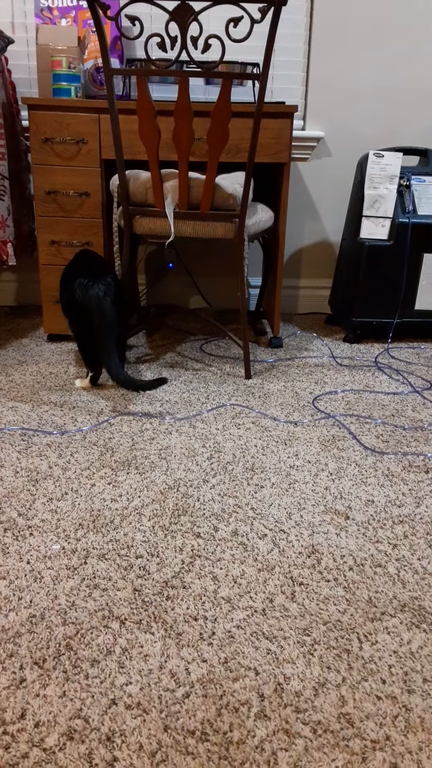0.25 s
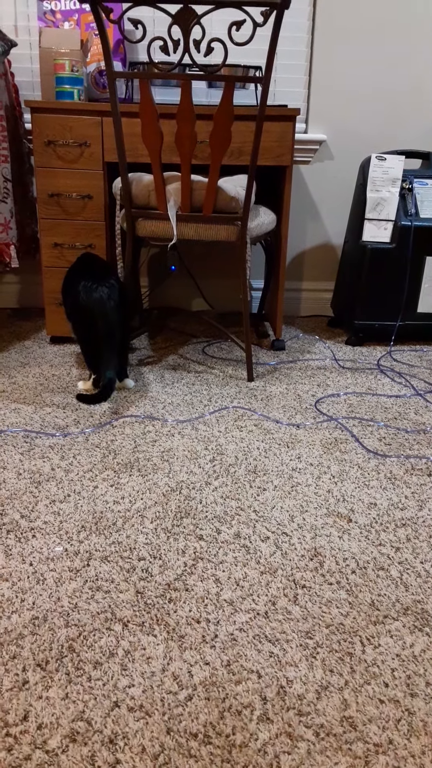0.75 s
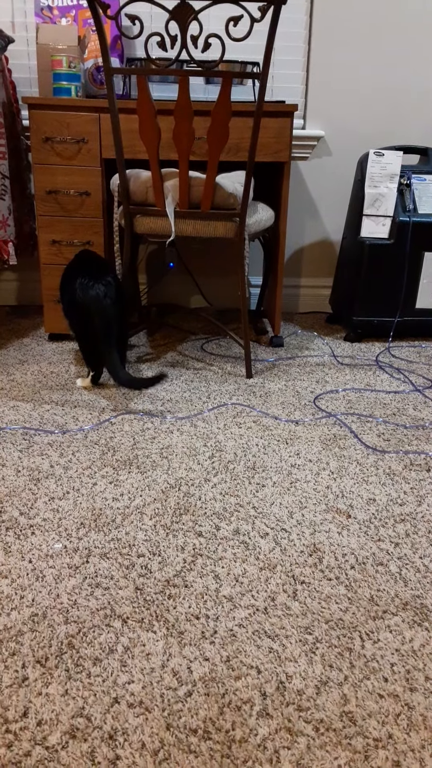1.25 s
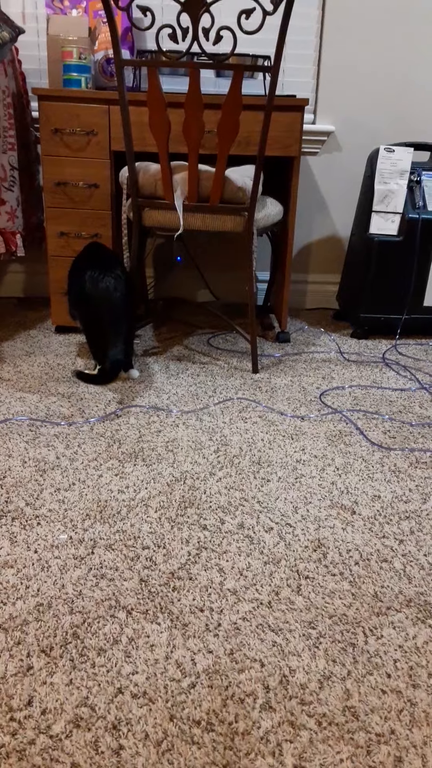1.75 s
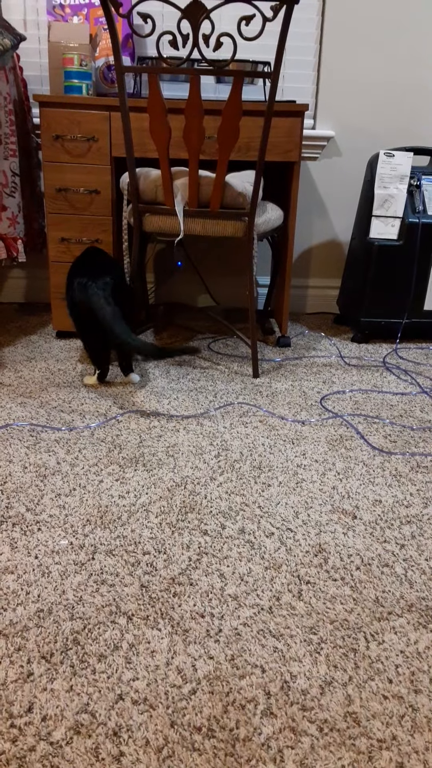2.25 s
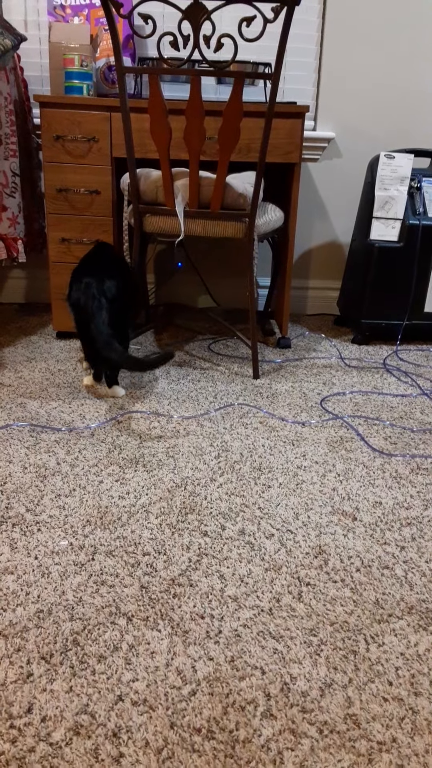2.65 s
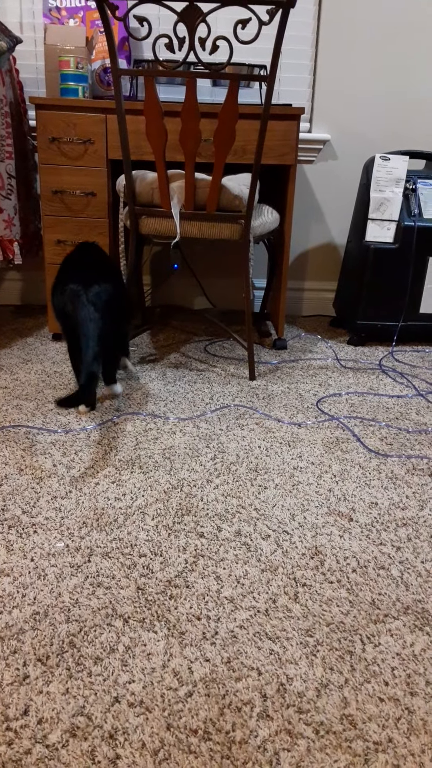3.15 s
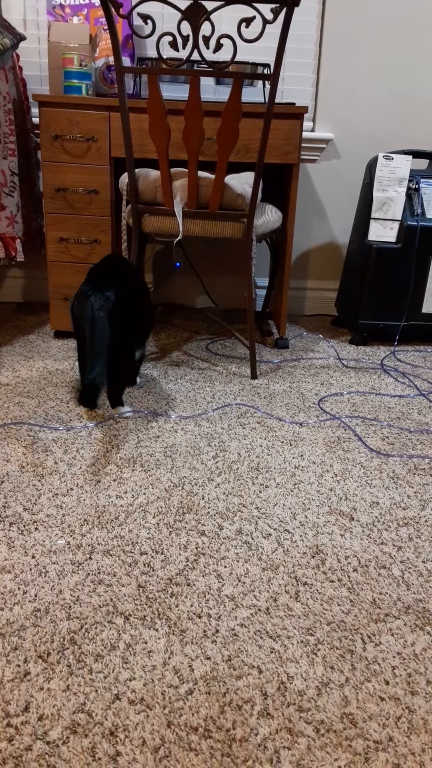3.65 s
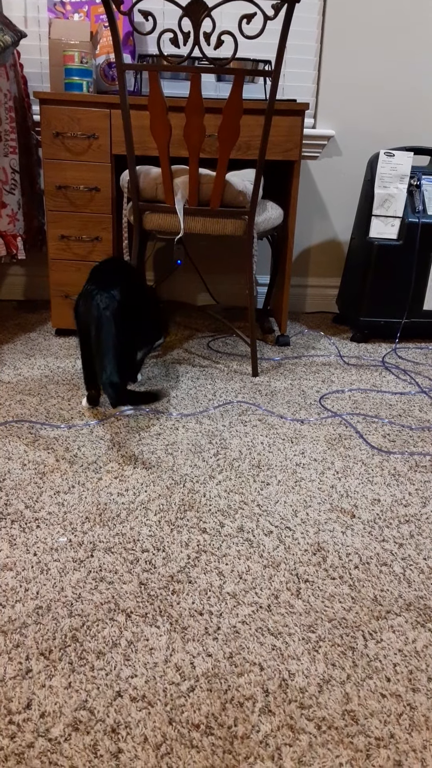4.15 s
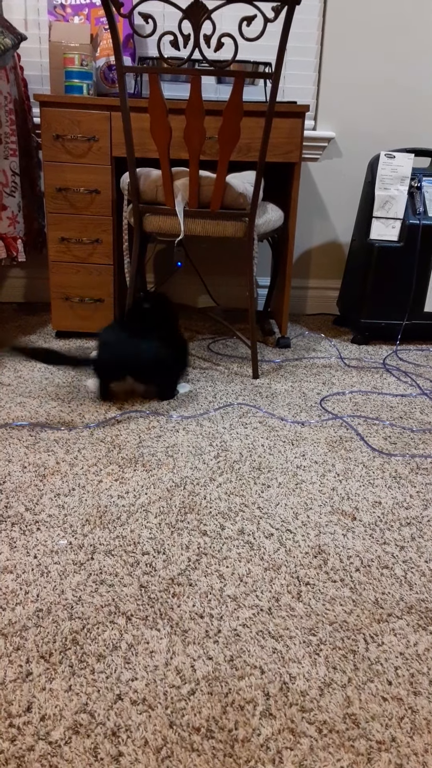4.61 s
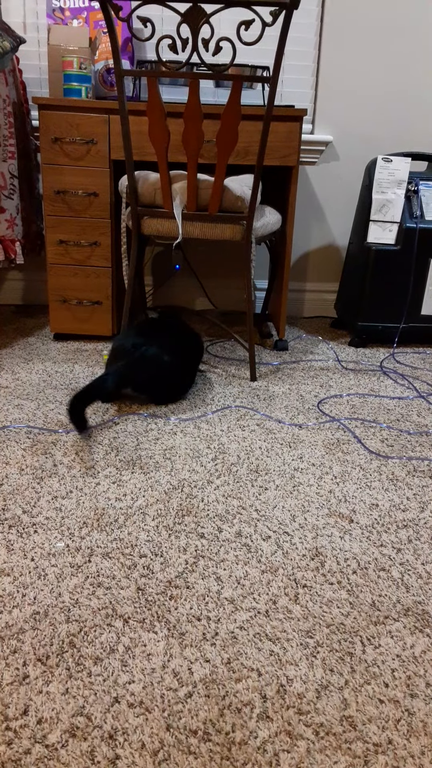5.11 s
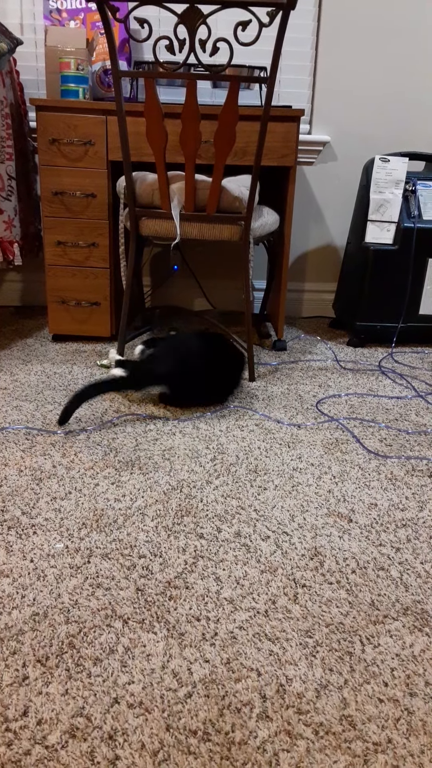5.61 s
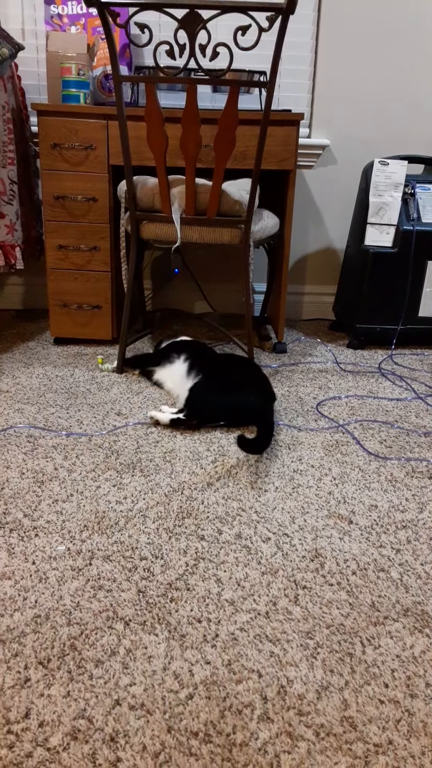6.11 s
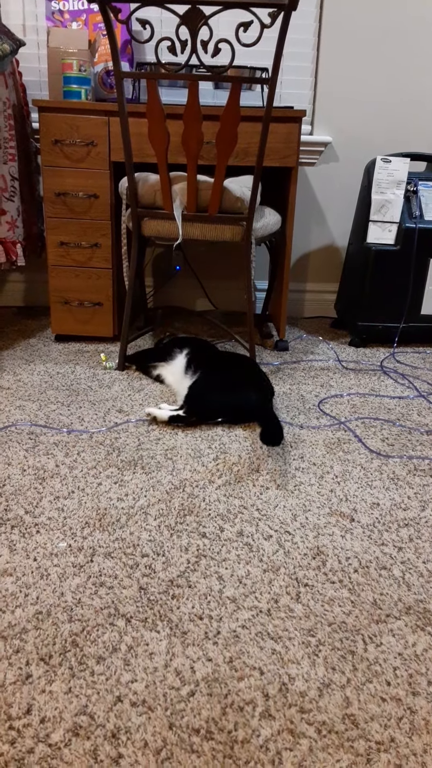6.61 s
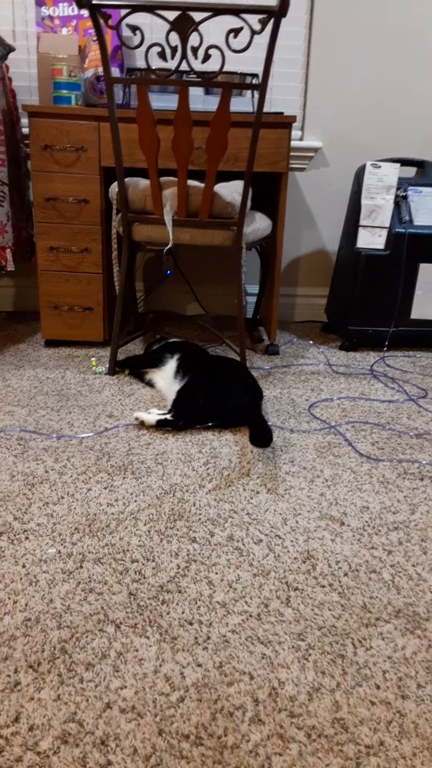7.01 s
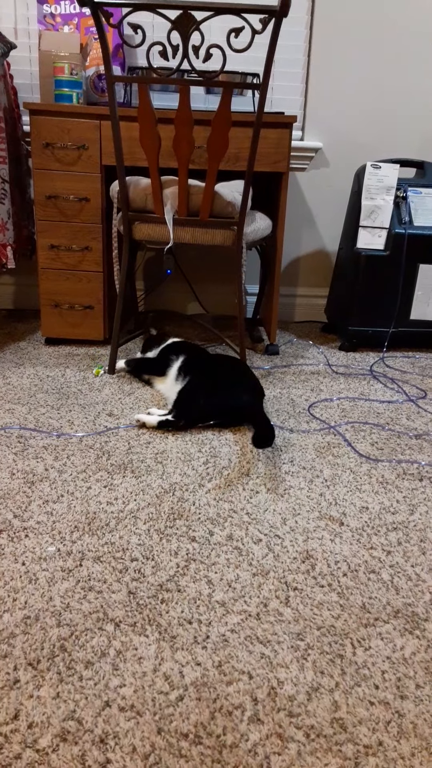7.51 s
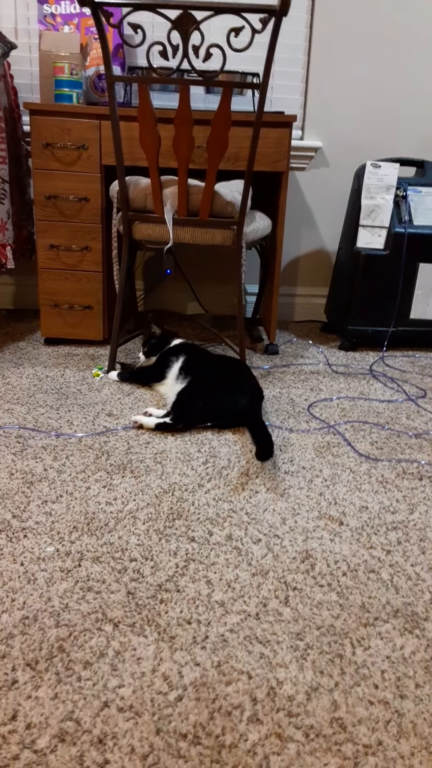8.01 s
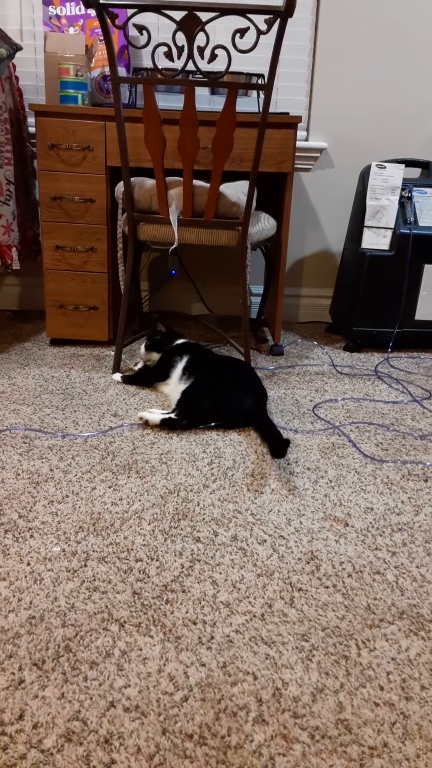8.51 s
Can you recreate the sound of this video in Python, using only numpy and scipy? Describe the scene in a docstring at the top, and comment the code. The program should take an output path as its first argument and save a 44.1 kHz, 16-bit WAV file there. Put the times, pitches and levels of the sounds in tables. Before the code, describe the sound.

Continuous compressor hum and airy fan noise fill a home room, heard in stereo from a few steps away with short reflections. Around two seconds a valve spits a bright hiss and muffled exhaust whoosh that fades away. Midway, claws rasp in carpet and a hard toy clacks against a rattling metal chair, with a tiny ping. After a calmer stretch, one more clear clack and several small clicks come near the end.

```python
"""Oxygen concentrator and playing cat

A compressor hums as shaft orders, with steady fan and mains tones, rumble and air as shaped noise.
Gas feeds with a hiss; at the vent a noise jet whistles, a low sine thumps and exhaust noise gushes.
Pressure falls, so the hum speeds up and softens; it slows and hardens as pressure builds again.
A cat rolls on carpet: filtered slip noise for fibres and claws, decaying modes for the toy's ping.
The toy knocks on a metal chair: contact noise, joint rattle and ringing modes, echoed by the room."""
import sys
import numpy as np
from scipy import signal
from scipy.fft import rfft, irfft
from scipy.io import wavfile

SR = 44100
rng = np.random.default_rng(int(sys.argv[2]) if len(sys.argv) > 2 else 0)


def generate_wav(sig):
    """Save sig (samples, or channels by samples) to the path in sys.argv[1] as 16-bit PCM at SR."""
    pcm = np.round(np.clip(np.atleast_2d(sig).T, -1, 1) * 32767).astype(np.int16)
    wavfile.write(sys.argv[1], SR, pcm)


N = 386316
TIME, BINS = np.arange(N) / SR, np.fft.rfftfreq(N, 1 / SR)


def amp(db):
    """Decibels to gain."""
    return 10 ** (np.asarray(db) / 20)


def at_hz(points, hz):
    """Interpolates a (f/Hz, value) table on a log-frequency axis."""
    f, value = np.transpose(points)
    return np.interp(np.log(hz + 1), np.log(f + 1), value)


def unit(x):
    """Scales to rms 1."""
    return x / np.sqrt(np.mean(x ** 2) + 1e-30)


def add(mix, s, sound):
    """Adds a sound into mix at s seconds, cut at the end."""
    part = mix[round(s * SR):][:len(sound)]
    part += sound[:len(part)]


def drift(rate_hz, size=8192):
    """Slow random modulation: low-passed noise of rms 1."""
    hz = np.fft.rfftfreq(size, N / SR / size)
    slow = irfft(rfft(rng.standard_normal(size)) / (1 + (hz / rate_hz) ** 4))
    return np.interp(TIME, np.linspace(0, N / SR, size), unit(slow))


# Left-right likeness of diffuse sound: (f/Hz, coherence)
COHERENCE = [(60, 0.99), (130, 1), (290, 0.96), (640, -0.21), (1410, -0.012), (3100, -0.15), (6820, -0.095),
             (15000, -0.26)]


def diffuse(gain):
    """Room-filling noise, gain per FFT bin: alike at both microphones only in the bass."""
    a, b = rfft(rng.standard_normal((2, N)))
    same = np.clip(at_hz(COHERENCE, BINS), -1, 1)
    right = same * a + np.sqrt(1 - same ** 2) * b
    return irfft(np.array([a, right]) * gain, N) * np.sqrt(SR / 2)


def hiss(spectrum):
    """Diffuse noise from a (f/Hz, level/(dB/Hz)) table."""
    return diffuse(amp(at_hz(spectrum, BINS)))


def colour(x, db):
    """Causal minimum-phase filter, dB per FFT bin of x."""
    log_gain = np.log(amp(np.concatenate([db, db[-2:0:-1]])))
    response = np.exp(np.conj(signal.hilbert(log_gain)))[:len(db)]
    return irfft(rfft(x) * response, len(x))


def contact(t, length_s, grain_db=0.91):
    """A decaying cluster of tiny slips, energy 1."""
    grain = amp(grain_db * np.minimum(rng.exponential(1, len(t)), 5))
    slips = rng.standard_normal(len(t)) * grain * np.exp(-t / length_s)
    return slips / np.linalg.norm(slips)


def flow(start_s, attack_s, hold_s, release_db_per_s):
    """Gain of a gas flow: opens linearly, holds, then dies away exponentially."""
    t = TIME - start_s
    return np.clip(t / attack_s, 0, 1) * amp(-release_db_per_s * np.maximum(t - hold_s, 0))


# First reflections from desk, walls and ceiling, before normalisation: (delay t/s, level/dB)
REFLECTIONS = [(.0012, -14), (.0023, -1), (.0047, -1.5), (.0069, 2.5), (.0105, -6.5), (.0155, -25),
               (.021, -2)]
# Reverberation time: (f/Hz, t60/s)
REVERB_T60 = [(600, 0.46), (1580, 0.32), (4180, 0.4), (11000, 0.25)]


def room(x, tail_db, direct_db=4, size=SR // 2, taps_per_s=4000):
    """Direct sound, early reflections, then sparse taps that decay by band; left response energy 1."""
    taps = rng.choice([-1., 1.], (2, size)) * (rng.random((2, size)) < taps_per_s / SR)
    hz, t, z = signal.stft(taps, SR, nperseg=256)
    decay = amp(-60 * t / at_hz(REVERB_T60, hz)[:, None])
    onset = np.clip(t / 0.0082, 0, 1)
    tail = signal.istft(z * decay * onset, SR)[1]
    response = amp(tail_db) * tail / np.linalg.norm(tail, axis=1, keepdims=True)
    response[:, 0] += amp(direct_db)
    for side in response:
        for delay_s, db in REFLECTIONS:
            jitter_s = rng.uniform(-.0003, .0003)  # separate per microphone
            add(side, abs(delay_s + jitter_s), amp([db]))
    return signal.fftconvolve(x[None], response / np.linalg.norm(response[0]), axes=1)[:, :N]


# Valve cycle: feed opens, full bed vents, feed shuts
FEED_S, VENT_S, SHUT_S = 0.844, 2.04, 5.7
BLEED_PER_S, EMPTY_S, FILL_S = .13, .2, 8.1


def pressure():
    """Bed pressure, 0 empty to 1 full: bleeds into the feed, drops at the vent, builds again."""
    before = 1 - BLEED_PER_S * np.maximum(TIME - FEED_S, 0)
    vented = np.clip((TIME - VENT_S) / EMPTY_S, 0, 1)
    return (1 - vented) * before + vented * (TIME - VENT_S) / FILL_S


# Shaft rate, full and empty
LOADED_HZ, EASED_HZ = 28.11, 28.88
ROLL_OFF_DB_PER_OCTAVE, SOFTEN_DB, SOFTEN_DB_PER_ORDER = 25, 1.5, 0.38
# Low shaft orders at full pressure, before panel lift: (multiple of shaft rate, level/dB)
SHAFT_ORDERS = [(2, -58), (3, -51.5), (4, -35.5), (5, -56), (6, -38), (7, -61.5), (8, -47.5), (9, -52),
                (10, -42), (11, -44), (12, -46), (13, -49), (15, -54)]
# Cabinet panel resonances: (f/Hz, width/Hz, lift/dB)
PANEL_MODES = [(507, 2.8, 8.5), (535, 12, 8.5), (675.4, 19, 16.5), (793, 18.6, 20.5), (817, 14.5, 15),
               (1043, 56, 25)]


def compressor(load, speed_hz, turns, flutter=0.034, flutter_hz=6, spread_hz=900, smear=0.15,
               sweep_turns=.012, count=38):
    """Shaft orders: pressure hardens the piston strokes, panels lift orders near resonance."""
    out = np.zeros((2, N))
    orders, levels = np.transpose(SHAFT_ORDERS)
    for order in range(2, count):
        octaves_above = max(np.log2(order / orders[-1]), 0)
        db = np.interp(order, orders, levels) - ROLL_OFF_DB_PER_OCTAVE * octaves_above
        lift_db = sum(top_db / (1 + (2 * (order * speed_hz - hz) / width_hz) ** 2)
                      for hz, width_hz, top_db in PANEL_MODES)
        soften_db = (SOFTEN_DB + SOFTEN_DB_PER_ORDER * order) * (1 - load)
        level = amp(db + lift_db - soften_db)
        waver = flutter * order / 10  # high orders are less steady
        # low even orders stay nearly phase-locked: two throbs a turn
        scatter = 1 if order % 2 else min(smear * (order / 10) ** 4, 1)
        lead_turns = sweep_turns * order ** 2 + scatter * rng.random()
        phase = 2 * np.pi * (order * turns + lead_turns) + waver * drift(flutter_hz)
        apart_rad = .5 * order * LOADED_HZ / spread_hz  # left microphone leads
        tone = np.cos(phase + [[apart_rad], [-apart_rad]])
        out += np.sqrt(2) * level * (1 + waver * drift(flutter_hz)) * tone
    return out


# Fan blades and mains hum: (f/Hz, level/dB rms)
FAN_AND_MAINS = [(253.4, -44), (511.5, -57), (685, -58.5), (120, -53)]


def fan(flutter=0.18, flutter_hz=7.8):
    """Fixed-pitch blade tones and mains hum, fluttering in level."""
    out = np.zeros(N)
    for hz, db in FAN_AND_MAINS:
        tone = np.cos(2 * np.pi * (hz * TIME + rng.random()))
        out += np.sqrt(2) * amp(db) * (1 + flutter * drift(flutter_hz)) * tone
    return out


# Cabinet rumble: (f/Hz, level/(dB/Hz))
CABINET_RUMBLE = [(8, -110), (24, -95), (32, -79), (50, -80), (100, -62.5), (150, -68), (230, -70),
                  (335, -67.5), (450, -74), (700, -87.5), (1500, -110)]
# Fan air: (f/Hz, level/(dB/Hz))
FAN_AIR = [(150, -100), (550, -78), (1000, -80), (1400, -85.5), (2000, -90.5), (2800, -94), (3400, -91),
           (5000, -99), (7500, -100), (9000, -103), (9700, -110), (10600, -110), (11600, -106),
           (13000, -105), (16000, -107)]
# Room modes shaken by the cabinet: (f/Hz, width/Hz, level/dB rms)
ROOM_MODES = [(75.7, 9.2, -44.5), (108.7, 7.9, -69)]


def airflow(turns, throb=0.12, chuff=0.063, swell_db=.5, swell_hz=12):
    """Rumble throbs once a turn, air with both piston strokes; low room modes boom."""
    rumble = hiss(CABINET_RUMBLE) * (1 - throb * np.cos(2 * np.pi * turns))
    boom = sum(amp(db) * unit(diffuse(1 / (1 + (2 * (BINS - hz) / width_hz) ** 4)))
               for hz, width_hz, db in ROOM_MODES)
    strokes = 1 + chuff * np.cos(2 * np.pi * 2 * turns)
    air = hiss(FAN_AIR) * strokes * amp(swell_db * drift(swell_hz))
    return boom + rumble + air


# Gas through the tubes, before level_db: (f/Hz, level/(dB/Hz))
FEED_GAS = [(3000, -115), (4500, -100), (7000, -104), (8000, -95.5), (9200, -95.5), (9700, -112),
            (10600, -112), (11500, -104), (13000, -104), (16000, -110)]
# Residual hiss after the feed shuts: (f/Hz, level/(dB/Hz))
SHUT_HISS = [(5000, -125), (6900, -100), (8500, -120), (16000, -130)]


def feed(level_db=-2.0, sag_db_per_s=0.5, open_s=0.027, shut_s=0.13):
    """Tube gas noise weakens slowly; shutting the feed crossfades to a thinner hiss."""
    shut = np.clip((TIME - SHUT_S) / shut_s, 0, 1)
    gas = amp(level_db) * hiss(FEED_GAS) * flow(FEED_S, open_s, 0, sag_db_per_s)
    return gas * (1 - shut) + hiss(SHUT_HISS) * shut


THUMP_HZ, THUMP_DB, THUMP_LENGTH_S = 130.3, -28, 0.094
# Valve jet, before level_db: (f/Hz, level/(dB/Hz))
VALVE_JET = [(2000, -100), (3000, -85), (3500, -75), (4200, -71.5), (5000, -68), (6200, -76.5), (7300, -82),
             (9000, -83), (10300, -89), (12300, -75), (14500, -69), (16000, -72)]


def valve(level_db=-4.0, attack_s=0.0063, hold_s=0.076, release_db_per_s=400, echo_db=-7,
          whistle_hz=5100, whistle_width_hz=900, whistle_db_per_hz=-69):
    """Short noise jet with a resonant whistle band, its room echo, and a pressure-release thump."""
    resonance = 1 / (1 + (2 * (BINS - whistle_hz) / whistle_width_hz) ** 2)
    whistle = amp(whistle_db_per_hz) * diffuse(resonance)
    jet = (hiss(VALVE_JET) + whistle) * flow(VENT_S, attack_s, hold_s, release_db_per_s) * amp(level_db)
    t = np.arange(0, THUMP_LENGTH_S, 1 / SR)
    thump = np.zeros(N)
    add(thump, VENT_S, amp(THUMP_DB) * np.hanning(len(t)) * np.sin(2 * np.pi * THUMP_HZ * t))
    return jet + amp(echo_db) * room(jet[0], tail_db=23) + thump


# Muffler noise, before gush and drain gains: (f/Hz, level/(dB/Hz))
MUFFLER = [(35, -87), (75, -62.5), (140, -66.5), (230, -63), (370, -62.5), (600, -76), (1300, -84.5),
           (2500, -87.5), (5500, -90.5), (8500, -91.5), (10300, -97), (12500, -88), (16000, -96)]


def exhaust(attack_s=.07, gush_db=-3, gush_db_per_s=90, drain_db=-2, drain_db_per_s=10,
            pipe_s=0.000953, pipe_echo=0.083):
    """The sieve bed gushes through the muffler, then drains slowly; tube echoes comb the noise."""
    pipe = 1 / abs(1 - pipe_echo * np.exp(2j * np.pi * BINS * pipe_s))
    gush = amp(gush_db) * flow(VENT_S, attack_s, attack_s, gush_db_per_s)
    drain = amp(drain_db) * flow(VENT_S, attack_s, attack_s, drain_db_per_s)
    return diffuse(amp(at_hz(MUFFLER, BINS)) * pipe) * (gush + drain)


ROLL_START_S, ROLL_END_S = 4.53, 5.7
# Carpet and claw filter, shared with claws(): (f/Hz, gain/dB)
CARPET_COLOUR = [(500, -31), (1600, -1), (3500, -2.5), (5000, -6), (6500, -2), (8500, -0.5), (10200, -9.5),
                 (12500, -3.5), (16000, -4)]


def scuffle(level_db=-54, snags_per_s=500, clump_db=5, clump_hz=12):
    """Faint clumps of snagging fibres as the cat rolls: sparse random impulses, filtered."""
    rolling = (TIME > ROLL_START_S) & (TIME < ROLL_END_S)
    snags = rng.standard_normal(N) * (rng.random(N) < snags_per_s / SR) * rolling
    clumps = amp(level_db + clump_db * np.tanh(drift(clump_hz)))
    return colour(snags * clumps, at_hz(CARPET_COLOUR, BINS))


# Claw strokes in carpet and on toy, before level_db: (t/s, level/dB, decay/s, tilt/(dB/octave))
CLAW_STROKES = [(4.544, -9.5, 0.022, 0), (4.654, -8.5, .013, 0), (4.673, -4.5, 0.013, 2),
                (4.987, -8, 0.0044, -1), (5.003, -5, .012, -2), (5.175, -5, 0.00026, 0),
                (5.179, -1.5, .0003, 1), (5.371, -13, .008, -2.5), (5.528, -13, .012, 3),
                (5.577, -14, .012, 6), (5.661, -12, .004, -3), (6.143, -15, .004, 6), (7.37, -13, .006, 6),
                (7.623, -7, 0.0052, 1), (8.362, -11, .001, 4), (8.476, -3, .0009, -4.5),
                (8.67, -7.5, 0.00098, .5), (8.675, -3, 0.00064, -0.5)]


def claws(level_db=-8, pivot_hz=7000, size=8192):
    """Claws catch in the pile and snap free: grainy slip bursts, filtered and tilted."""
    t, hz, out = np.arange(size) / SR, np.fft.rfftfreq(size, 1 / SR), np.zeros(N)
    for s, db, length_s, tilt in CLAW_STROKES:
        shape_db = at_hz(CARPET_COLOUR, hz) + tilt * np.log2(np.maximum(hz, 2000) / pivot_hz)
        add(out, s, amp(level_db + db) * colour(contact(t, length_s, grain_db=4.2), shape_db))
    return out


LATE_RING_HZ, LATE_RING_DB, LATE_RING_S = 5330, -54, 0.055
# Metal chair modes, before ring_db: (f/Hz, level/dB, t60/s)
CHAIR_MODES = [(780, -17, 0.2), (944, 4, 0.082), (990, -6, 0.14), (1195, -1, 0.11), (1292, 12.5, 0.061),
               (1447, 5, 0.12), (1580, -2.5, 0.13), (1723, -8, 0.14), (2003, -3, 0.16), (2124, 4.5, 0.075),
               (2484, 6.5, 0.081), (2530, -5, 0.14), (2700, -2, .12), (2780, -2, 0.091), (2883, 4.5, 0.056),
               (3480, 5, 0.042), (3540, 2, 0.062), (3940, -3, 0.083), (4380, -10, 0.062), (5322, -10, 0.37),
               (6370, -5, 0.082), (6590, -4, .08), (6830, 0.5, 0.095), (7900, -9, 0.064), (8210, -2, 0.14),
               (8400, -27, 0.054)]
# Contact crack filter: (f/Hz, gain/dB)
CRACK_COLOUR = [(200, -16), (600, -7), (1000, -3), (1600, -4), (2400, -5.5), (3100, -10), (4200, -3),
                (5500, -8.5), (7500, -4), (9000, -5), (10000, -22.5), (13000, -19), (16000, -27)]
# Knocks on the chair: (t/s, level/dB, brightness f/Hz, contact/s)
CHAIR_KNOCKS = [(4.775, 0.5, 14000, 0.0031), (5.001, -10, 2110, 0.0046), (5.019, -11.5, 2700, 0.0054),
                (5.292, -16, 2450, .004), (8.2605, -4, 14000, 0.0021), (8.369, -15, 2300, 0.0047),
                (8.479, -17.5, 3260, 0.0034)]


def knocks(crack_db=15, ring_db=-28.0, snap=0.65, rattle_db=11, rattle_s=0.029, rattle_hz=2200, size=32768):
    """Each knock cracks, rattles the joints and rings the chair; soft knocks lose treble."""
    t, hz, out = np.arange(size) / SR, np.fft.rfftfreq(size, 1 / SR), np.zeros(N)
    crack_shape_db = at_hz(CRACK_COLOUR, hz)
    rattle_shape_db = crack_shape_db - 10 * np.log10(1 + (hz / rattle_hz) ** 4)
    # one high mode swells and fades after the blow
    swell = np.sin(np.pi / 2 * np.minimum(t / LATE_RING_S, 2)) ** 2
    late = amp(LATE_RING_DB) * swell * np.sin(2 * np.pi * LATE_RING_HZ * t)
    for s, db, bright_hz, length_s in CHAIR_KNOCKS:
        ring = sum(amp(mode_db - 60 * t / t60_s) * np.sin(2 * np.pi * (f * t + rng.random()))
                   for f, mode_db, t60_s in CHAIR_MODES)
        ring = amp(ring_db) * ring * (1 - np.exp(-t / length_s))
        crack = amp(crack_db) * colour(contact(t, length_s) + snap * (t == 0), crack_shape_db)
        rattle = amp(rattle_db) * colour(contact(t, rattle_s), rattle_shape_db)
        blow = colour(ring + crack + rattle, -10 * np.log10(1 + (hz / bright_hz) ** 6))
        add(out, s, amp(db) * (blow + amp(.5 * db) * late))  # late ring favours hard knocks
    return out


PING_S, PING_DB = 5.662, -44.5
# Toy's small hard part, before PING_DB: (f/Hz, level/dB, t60/s)
TOY_MODES = [(2650, -5, .08), (6100, 3, .045), (6300, -1, .05), (8250, -2, .04)]


def ping(size=8192):
    """One ping of the toy: short, high decaying modes."""
    t, out = np.arange(size) / SR, np.zeros(N)
    modes = sum(amp(PING_DB + db - 60 * t / t60_s) * np.sin(2 * np.pi * hz * t)
                for hz, db, t60_s in TOY_MODES)
    add(out, PING_S, modes)
    return out


def scene():
    """Machine and cat in one room; pressure slows the motor."""
    load = pressure()
    speed_hz = EASED_HZ + load * (LOADED_HZ - EASED_HZ)
    turns = np.cumsum(speed_hz) / SR
    machine = compressor(load, speed_hz, turns) + fan() + airflow(turns)
    machine = machine + feed() + valve() + exhaust()
    cat = room(scuffle() + claws() + ping(), tail_db=6.0)
    return machine + cat + room(knocks(), tail_db=6.5)


EDGE_HZ = 15900
# Channel balance: (f/Hz, left minus right level/dB)
BALANCE = [(60, 3.5), (110, 2.5), (200, 7), (380, -0.5), (700, 7.5), (1290, 1.5), (2380, 5), (4400, 3),
           (8120, 3.5), (15000, 4.0)]


def record(dry):
    """Channel balance by frequency, left mostly louder, then a low-pass band limit."""
    lean = amp(at_hz(BALANCE, BINS) * np.array([[.5], [-.5]]))
    heard = irfft(rfft(dry) * lean, N)
    low_pass = signal.firwin(511, EDGE_HZ, window=("kaiser", 9), fs=SR)
    return signal.oaconvolve(heard, low_pass[None], "same")


dry = scene()
out = record(dry)
generate_wav(out)
```